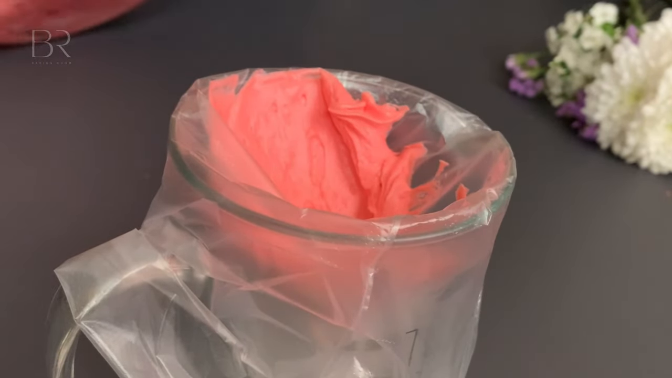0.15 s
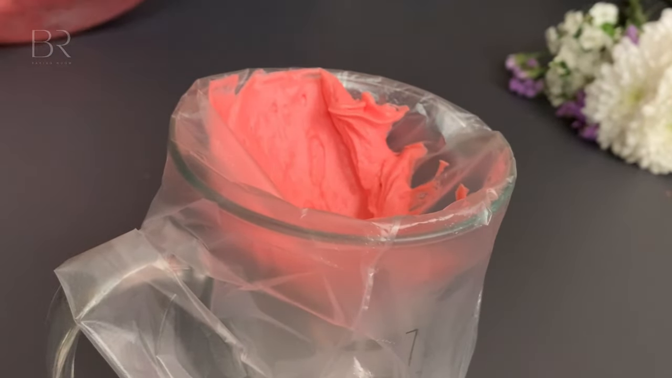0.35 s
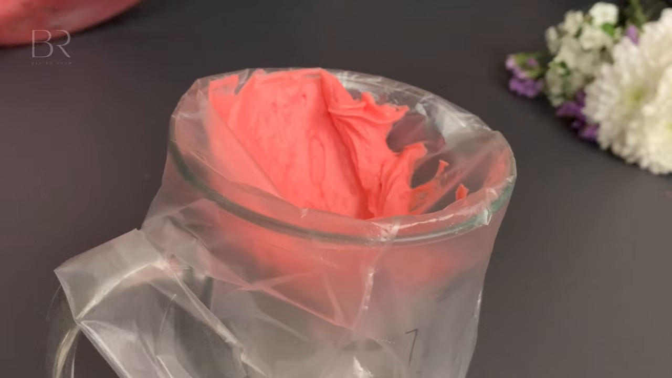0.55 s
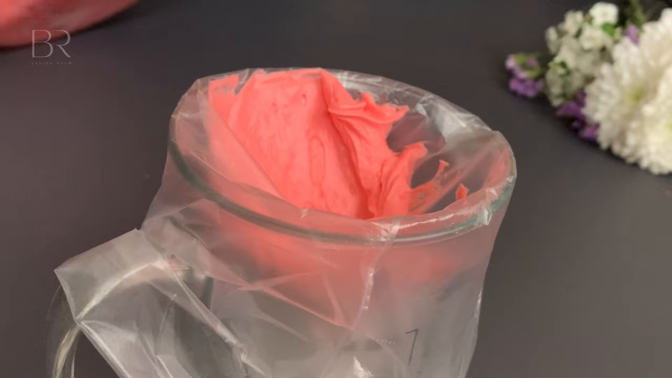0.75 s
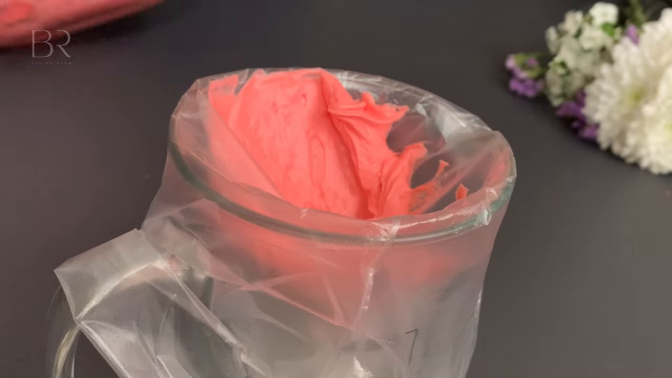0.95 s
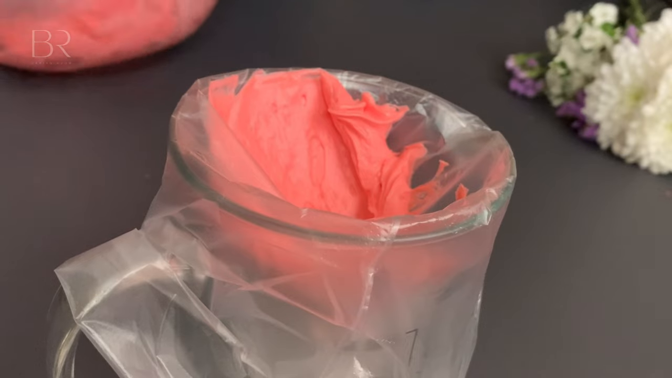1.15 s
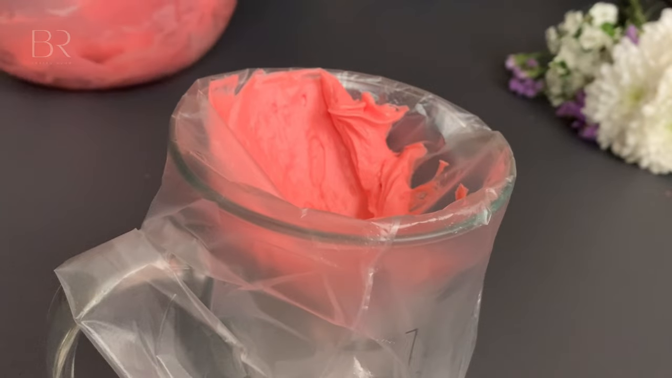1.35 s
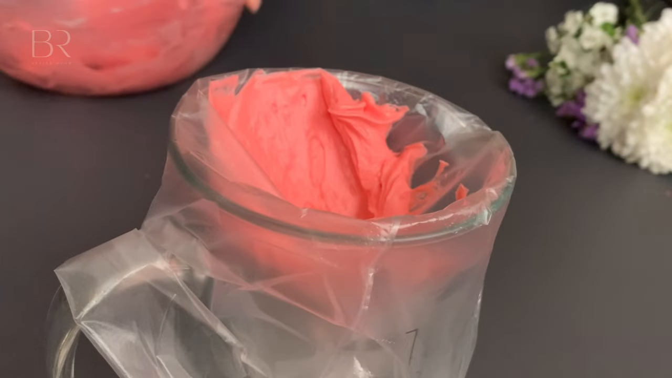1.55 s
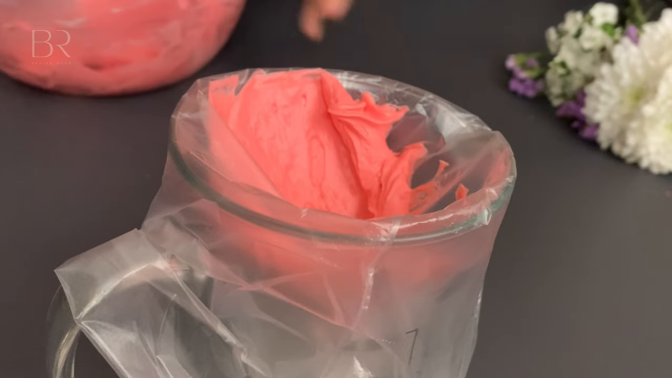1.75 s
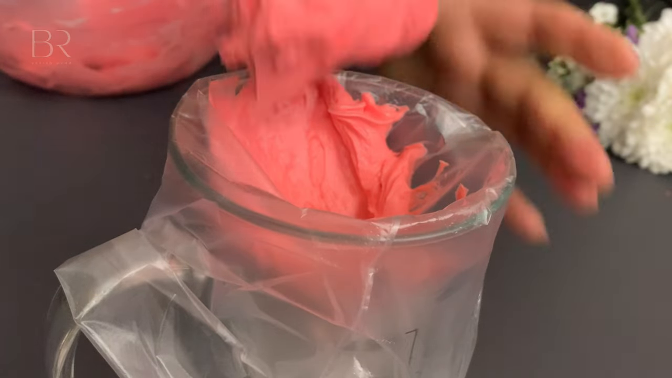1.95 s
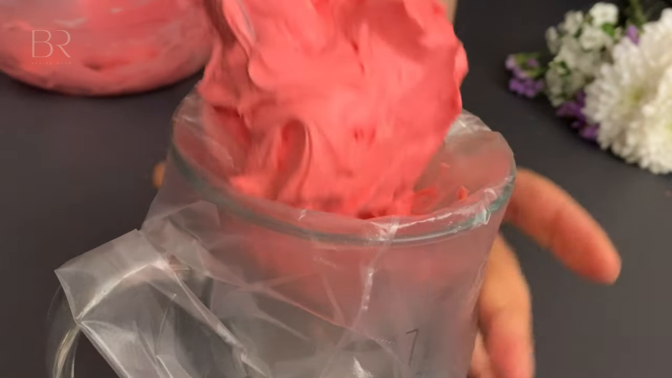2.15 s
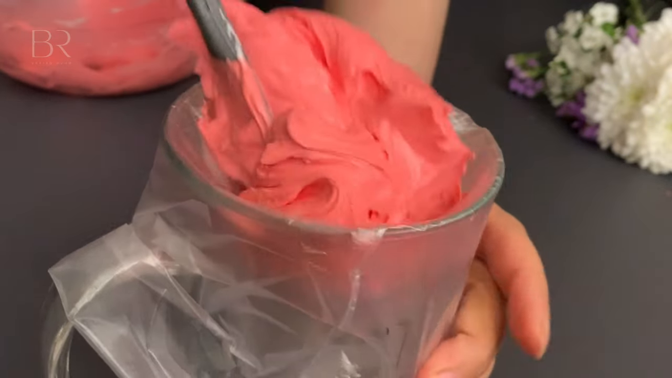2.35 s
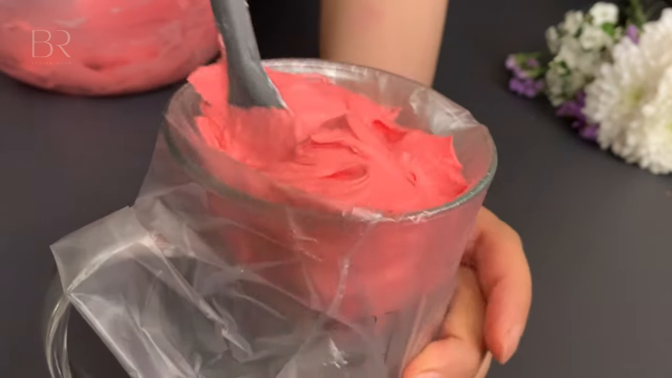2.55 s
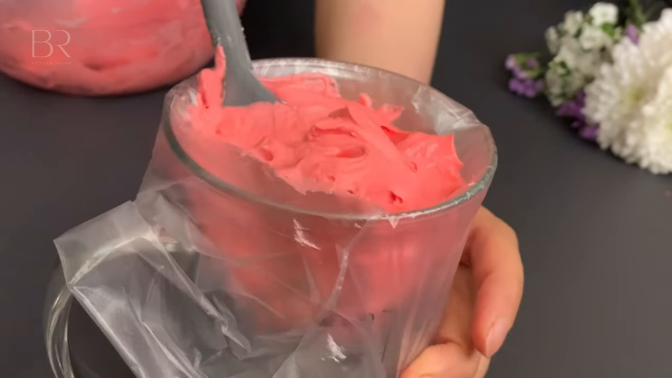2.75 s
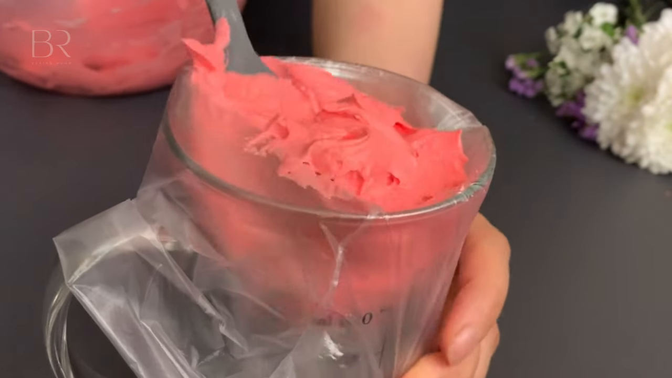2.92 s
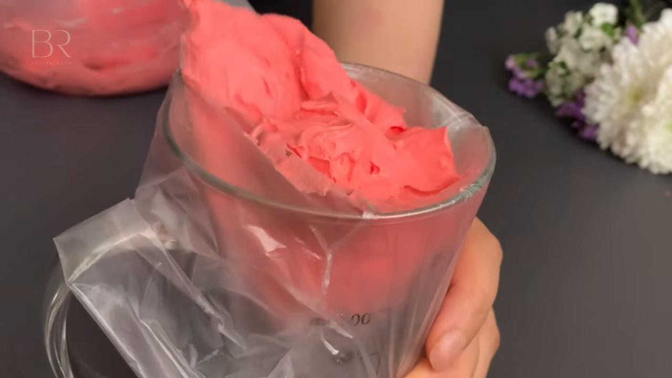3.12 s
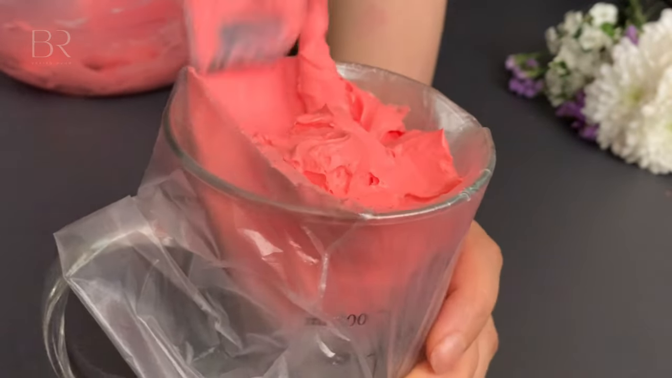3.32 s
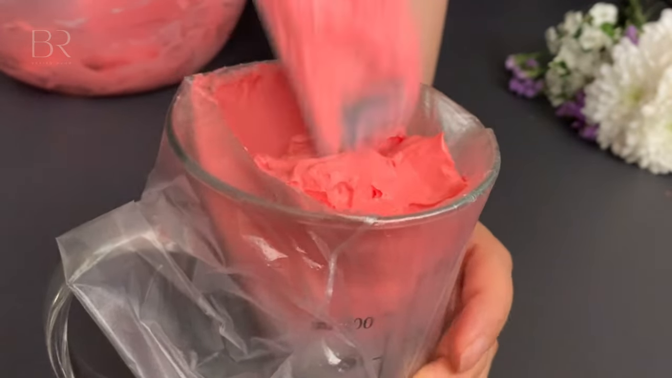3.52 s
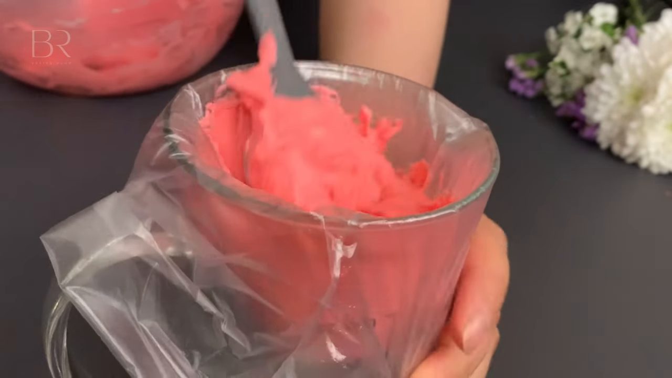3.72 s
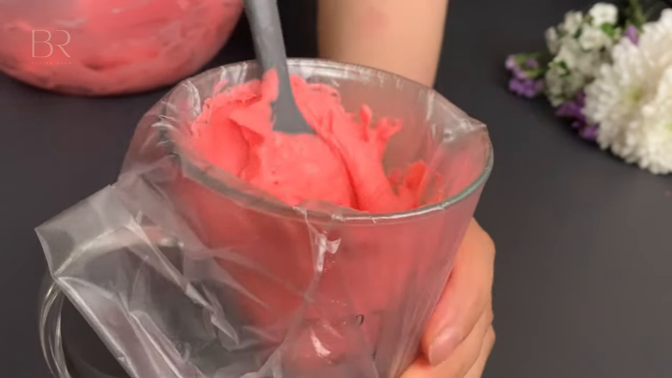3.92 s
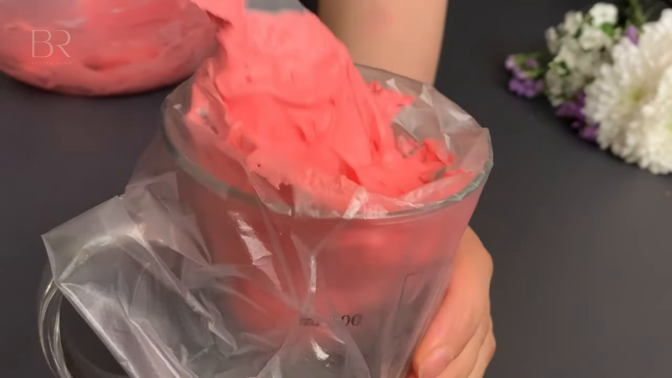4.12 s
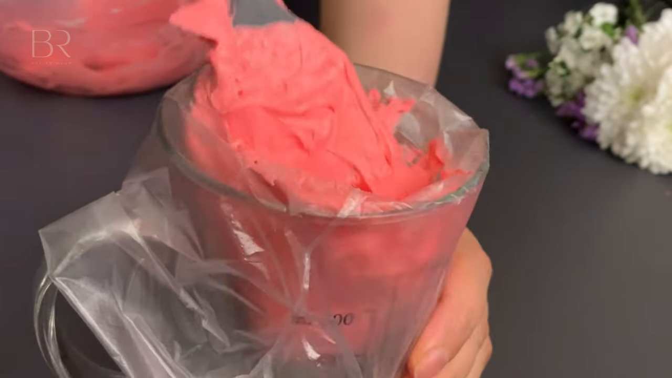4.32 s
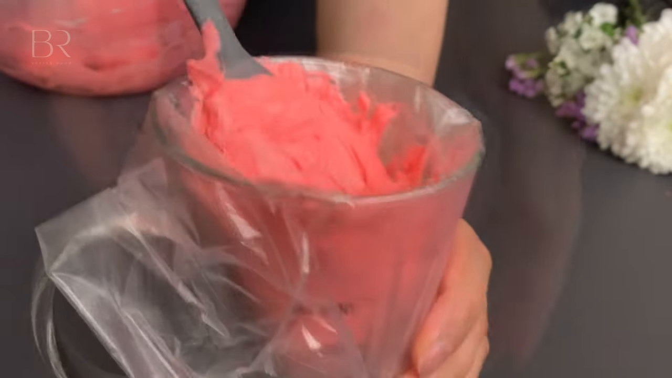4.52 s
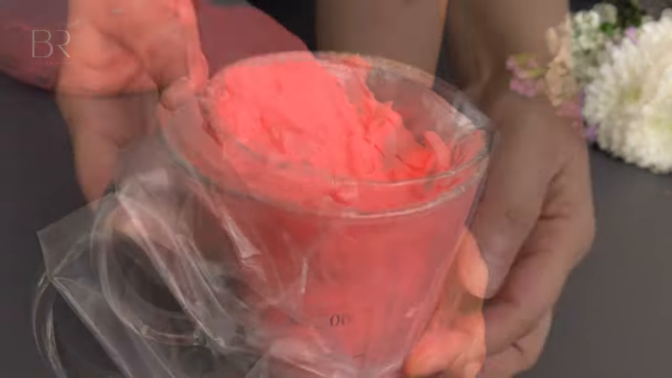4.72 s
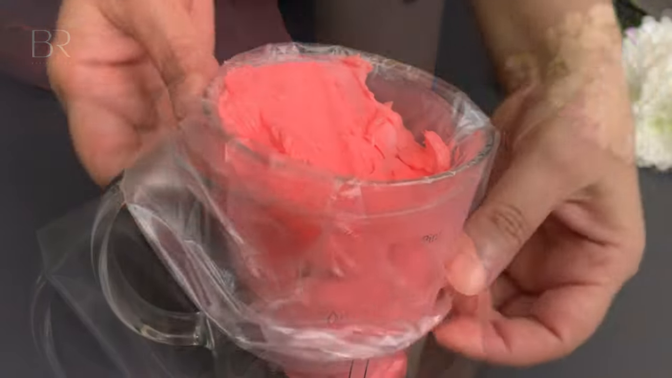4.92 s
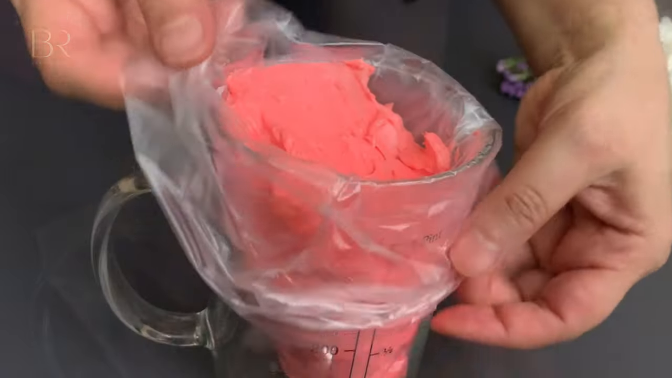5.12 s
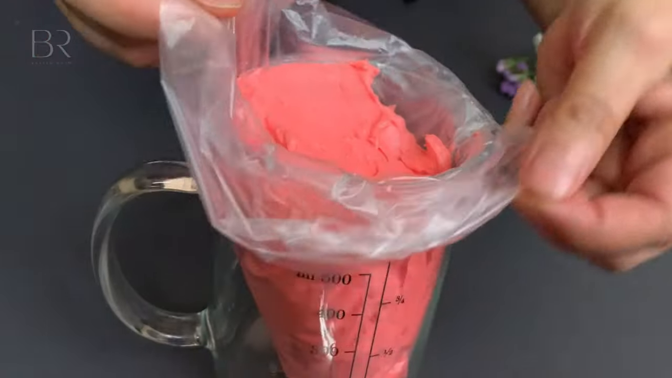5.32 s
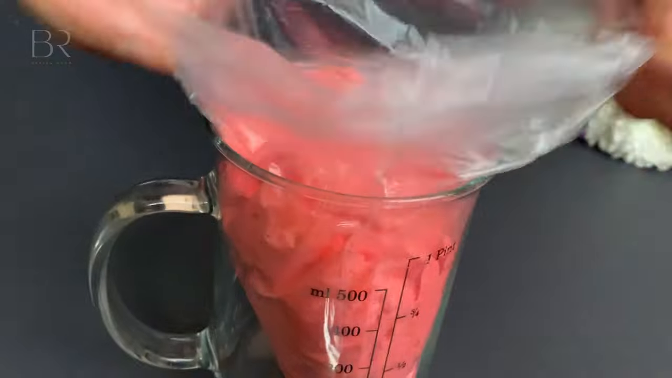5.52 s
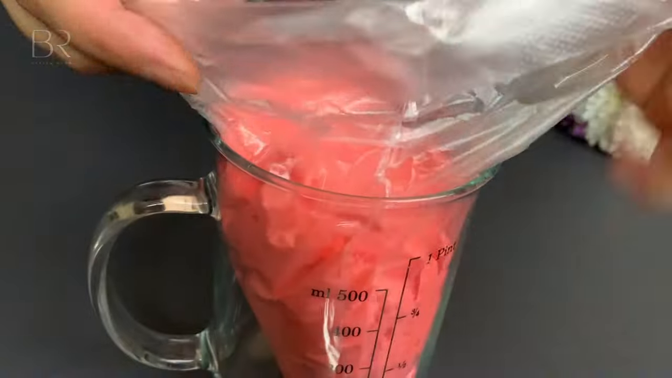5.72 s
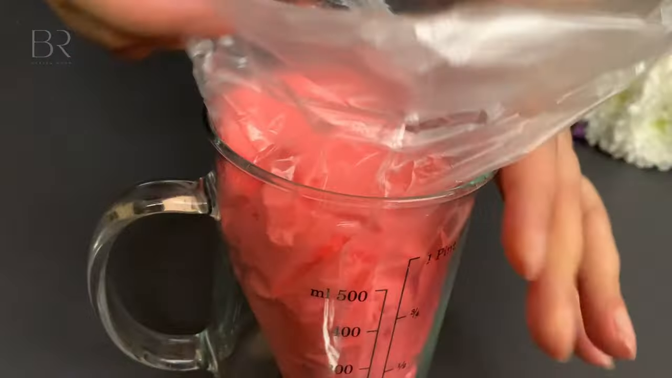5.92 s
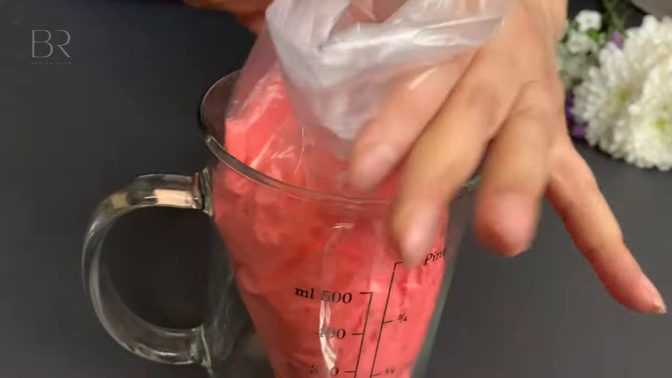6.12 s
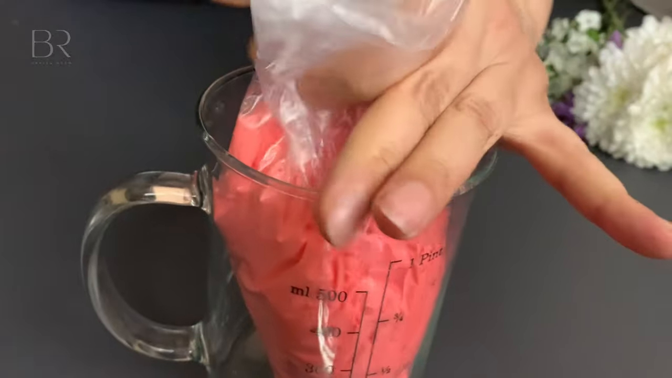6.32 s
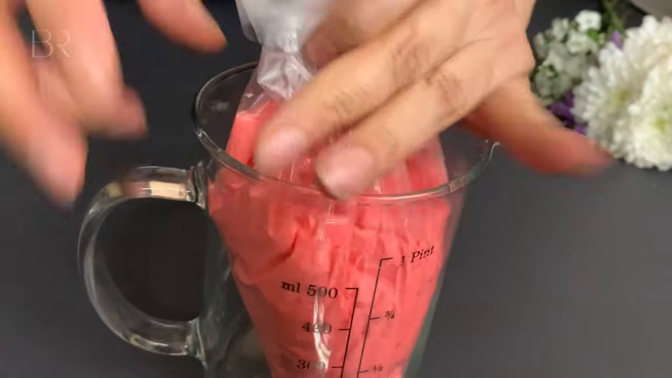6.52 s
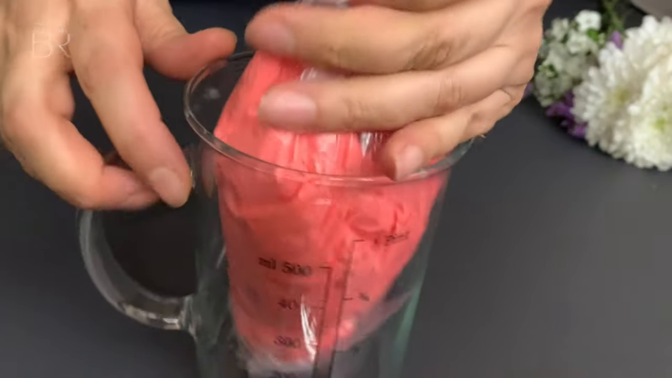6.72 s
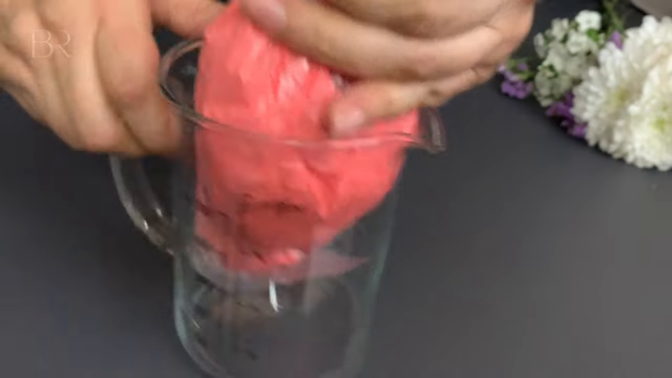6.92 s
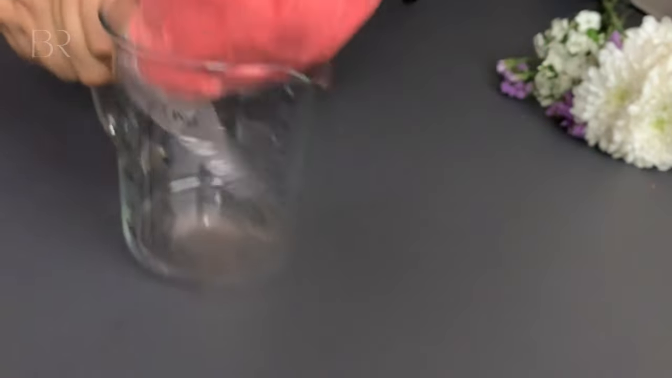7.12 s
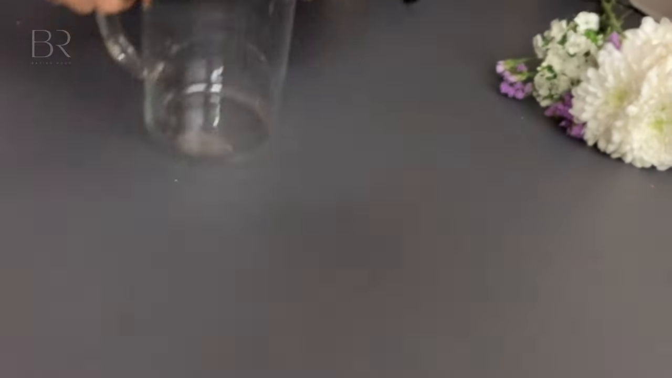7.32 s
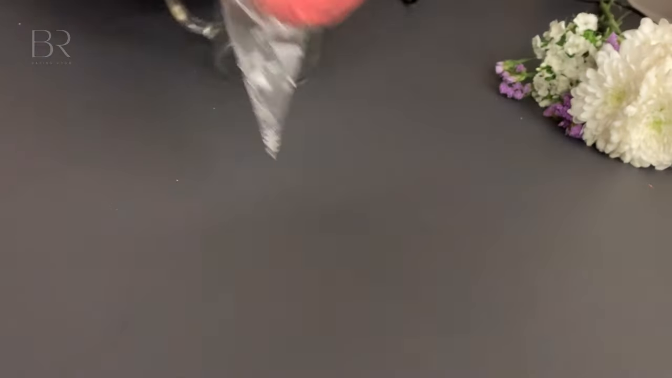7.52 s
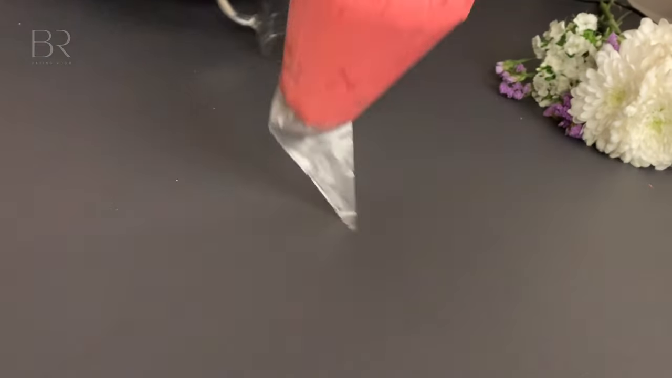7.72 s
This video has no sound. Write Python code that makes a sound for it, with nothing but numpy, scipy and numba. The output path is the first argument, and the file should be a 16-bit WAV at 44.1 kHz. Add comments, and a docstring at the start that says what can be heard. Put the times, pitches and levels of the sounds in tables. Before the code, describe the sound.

Thick frosting squelches and crackles as a spatula presses it into a thin plastic bag lining a glass jug, then the bag rustles out.

```python
"""Thick frosting, scraped off a spatula into a thin plastic piping bag that lines a glass jug, squelches and crackles.
Sticky film, bursting air pockets and creases are showers of short damped grains, with louder buckles one by one.
The mixing bowl rings faintly in damped modes and bumps the table; soft contacts give low notes and rubs of noise.
Then the bag is unfolded, gathered and pulled out; jug and trapped air resonate over the low rumble of a small kitchen."""
import sys
import numpy as np
from scipy import signal
from scipy.fft import rfft, irfft, next_fast_len
from scipy.io import wavfile
from numba import njit

SR = 44100
rng = np.random.default_rng(int(sys.argv[2]) if len(sys.argv) > 2 else 0)


def output_pcm(signal):
    """Save a mono or channel-first signal as 16-bit PCM at the path in sys.argv[1].

    Samples are clipped to [-1, 1] before scaling.
    """
    pcm = np.clip(np.atleast_2d(signal).T, -1, 1) * 32767
    wavfile.write(sys.argv[1], SR, np.round(pcm).astype(np.int16))


N = 342286
FFT_SIZE = next_fast_len(N, real=True)

# Spectrum of the kitchen air. Each row: frequency in Hz, level in dB.
KITCHEN_SPECTRUM = [(20, -7.5), (45, 3), (100, -2), (150, -15.5), (210, -16.5), (300, -21), (500, -35.5),
                    (1000, -43), (3000, -48), (7000, -53), (9500, -45.5), (11500, -61.5), (14500, -50),
                    (16000, -75)]
KITCHEN_DB = -58
# Nudges of the mixing bowl. Each row: start in seconds, level in dB, rise time in seconds, highest excited Hz.
BOWL_TOUCHES = [(.031, -64.5, 0.0053, 8000), (.042, -58.5, 0.0037, 4970), (0.061, -55, 0.0055, 4000),
                (.173, -69, 0.0042, 6000), (1.705, -50.5, 0.047, 1050), (1.689, -70, 0.01, 8030)]
# Modes of the glass bowl. Each row: frequency in Hz, level in dB, t60 in seconds.
BOWL_MODES = [(441, -7.5, 0.11), (1243, -1, 0.067), (1179, -1, 0.17), (2130, -8, 0.17), (3370, -14, 0.076),
              (3480, -5, 0.097), (4650, -10, 0.11), (4735, -22, 0.1), (6900, -9, 0.1)]
# Light brushes of bowl, bag and jug. Each row: start in seconds, level in dB, centre in Hz, t60 in seconds.
SCUFFS = [(0.04, -59.5, 447, 0.21), (.042, -73, 2000, 0.14), (.64, -72.5, 506, 0.55),
          (0.929, -65.5, 377, 0.15), (1.039, -78, 5900, .17), (1.255, -74, 4800, 0.055),
          (1.506, -70.5, 5000, .1), (1.512, -47.5, 215, 0.4), (1.519, -55.5, 550, 0.11),
          (1.53, -71, 650, 0.29), (1.511, -67, 1450, 0.076), (1.947, -69, 3900, 0.09),
          (2.719, -46, 217, 0.75), (7.1, -51.5, 210, 0.61), (7.25, -49.5, 178, 1),
          (7.709, -47.5, 416, 0.19)]
# Soft knocks of bowl, frosting and jug. Each row: start in seconds, level in dB, pitch in Hz, t60 in seconds.
KNOCKS = [(0.045, -60, 445, 0.2), (0.072, -36, 89, 0.053), (1.52, -42, 207.5, 0.22),
          (1.524, -32, 119, 0.08), (1.54, -22, 81, 0.072), (1.583, -34, 105, 0.079),
          (2.386, -25, 420, 0.029), (2.722, -24, 340, 0.012), (3.045, -30, 295, 0.025),
          (3.047, -42, 177, 0.058), (4.062, -14.5, 318, 0.011), (4.143, -18, 148, 0.016),
          (4.504, -38, 302, 0.03), (4.521, -25, 137, 0.017), (5.46, -27.5, 420, 0.058),
          (5.469, -41, 205, 0.28), (5.64, -41, 127, 0.124), (5.699, -31.5, 66.07, 0.13),
          (6.628, -38, 77, 0.38), (7.113, -40.5, 192, 0.072), (7.165, -45, 197, 0.12),
          (7.264, -32.5, 633, 0.026), (7.259, -37, 179, 0.12), (7.314, -41.5, 121.6, 0.17),
          (7.712, -46, 570, 0.13), (7.715, -42, 305, 0.12), (7.718, -41, 205, 0.23)]
# Creases snapping. Each row: start in seconds, level in dB, pitch in Hz.
SNAPS = [(0.3735, -63.5, 7200), (1.039, -58.5, 5790), (1.9465, -54, 4700), (2.141, -41, 6800),
         (2.1525, -50, 2830), (2.3265, -36.5, 6170), (2.4305, -36, 4883), (2.6599, -38.5, 6300),
         (2.8125, -34, 3620), (2.8818, -34.5, 6600), (2.938, -30.5, 5800), (2.9437, -34, 5870),
         (2.994, -48, 5200), (3.2058, -49, 5130), (3.212, -40.5, 7840), (3.4735, -45, 4340),
         (3.561, -38.5, 2490), (4.3226, -39, 3270), (4.336, -44, 4000), (4.7097, -43, 3960),
         (5.7354, -41, 4800), (5.8655, -33.5, 6800), (6.0725, -30, 3180), (6.2344, -38, 3080),
         (6.3145, -31, 2830), (6.413, -31.5, 6560), (6.886, -36.5, 2700), (7.1975, -33, 5030),
         (7.2084, -31, 4380), (7.47, -50, 2640), (7.575, -51, 3320), (7.6522, -40, 4000)]
# Soft folds and air pockets popping. Each row: start in seconds, level in dB, pitch in Hz.
POPS = [(2.084, -53, 1640), (2.1316, -43, 1570), (2.735, -29, 1890), (2.787, -35, 1880),
        (2.9484, -24.5, 1710), (2.986, -34, 1760), (3.078, -34, 1720), (3.0565, -26, 1760),
        (3.3834, -32.5, 1750), (3.6222, -44, 1830), (4.4384, -35, 1600), (4.003, -32, 1680),
        (4.0614, -23.5, 1800), (4.4937, -24.5, 1700), (5.4594, -23, 1260), (5.4666, -30, 1350),
        (5.574, -26, 1430), (5.8923, -24, 1390), (5.9184, -28, 1333), (6.0736, -21, 1250),
        (6.535, -32, 1770), (6.574, -36, 1090), (6.6109, -34, 1500), (6.6346, -31.5, 1540),
        (6.675, -29.5, 1500), (6.7, -35, 1850), (6.7188, -27, 1590), (6.7675, -32.5, 1390),
        (6.827, -34, 1620), (6.899, -35, 1140), (6.8852, -31.5, 1400), (7.0227, -32, 1600),
        (7.178, -32.5, 1130), (7.2077, -30, 2170), (7.343, -42.5, 1300)]
# A fold gives way in a few quick steps, each weaker than the last.
BUCKLE_GAP_S, BUCKLE_FALL_DB = .0026, 10.5

# Spatula strokes. Each row: start in seconds, attack in seconds, length in seconds, film crackle in dB,
# air pockets in dB above the film, squelch in dB above the film.
STROKES = [(2.119, 0.14, 0.17, -44.5, -1.5, -4), (2.308, 0.013, 0.16, -49.5, -3.5, 0.5),
           (2.473, 0.059, 0.1, -49.5, -4.5, -6.5), (2.597, 0.041, 0.076, -54.5, -1.5, -6),
           (2.681, 0.042, 0.17, -47, 1, 0.5), (2.854, 0.032, 0.16, -52, 0.5, 0),
           (3.025, 0.021, 0.06, -51.5, -2, 2.5), (3.115, 0.022, 0.091, -58, 1.5, -0.5),
           (3.261, 0.099, 0.13, -53, -2, -0.5), (3.538, 0.083, 0.14, -43.5, -2.5, -2.5),
           (3.688, 0.039, 0.14, -53, 6, -2), (3.854, 0.035, 0.11, -58, 0.5, -5.5),
           (3.958, 0.054, 0.12, -44, -1, -1), (4.02, 0.046, 0.096, -44, 3.5, 1.5),
           (4.174, 0.03, 0.084, -52.5, 2.5, -5.5), (4.311, 0.0041, 0.072, -57, 1, -1.5),
           (4.386, 0.058, 0.065, -43.5, 1, -2.5), (4.46, 0.043, 0.031, -48.5, -2.5, 9),
           (4.534, 0.083, 0.1, -51, 1.5, 0)]
# The spatula leans on the film between strokes. Each row: start in seconds, length in seconds.
LEANS = [(2.14, 1.23), (3.454, 1.395)]
# LEAN_WET_DB sets air pockets and squelch relative to the film.
LEAN_ATTACK_S, LEAN_DB, LEAN_WET_DB = 0.0074, -64.5, -0.5
# The frosting yields under a stroke; the film settles when let go.
STROKE_SAG_DB_PER_S, RELEASE_DB_PER_S = 21, 206
# Spectrum of the frosting's crackle. Each row: frequency in Hz, level in dB.
FROSTING_SPECTRUM = [(100, -9), (215, -3), (310, -9), (440, 0), (620, -8), (930, -10), (1250, -7),
                     (1780, -9.5), (2500, -12.5), (4000, -12.5), (6700, -14), (8200, -17.5), (10500, -18.5),
                     (13000, -103)]
# Resonance of the air pockets in the frosting. Each row: time in seconds, frequency in Hz.
POCKET_PITCH = [(2.15, 1750), (2.71, 1940), (3.53, 1680), (3.56, 1840), (3.8, 1790), (3.89, 1550),
                (4.19, 1980), (4.66, 1580), (4.7, 1700)]
# Hollow under the first dollop as it sinks in. Each row: time in seconds, resonance in Hz, level in dB.
FROSTING_HOLLOW = [(2.13, 509.5, -65), (2.16, 487, -53.5), (2.25, 465, -49), (2.45, 428, -69),
                   (2.55, 447, -52), (2.62, 426, -89)]

# Hand moves that unfold, lift, gather and pull out the bag. Each row: start in seconds, attack in seconds,
# length in seconds, film crackle in dB, folds in dB above the film, flapping in dB above the film.
HAND_MOVES = [(4.752, 0.33, 0.89, -49.5, -6, -10), (5.114, 0.058, 0.46, -52, -1.5, -7),
              (5.428, 0.027, 0.062, -41.5, 1.5, -6.5), (5.475, 0.081, 0.12, -41.5, 1, -1.5),
              (5.644, 0.02, 0.036, -47.5, -3.5, -7.5), (5.712, 0.023, 0.089, -54.5, 0.5, -1.5),
              (5.842, 0.064, 0.59, -46.5, 1, -6.5), (5.99, 0.08, 0.11, -43, 3.5, -3.5),
              (6.326, 0.028, 0.05, -51.5, 3, -2), (6.469, 0.059, 0.1, -49.5, 0, -4.5),
              (6.601, 0.018, 0.25, -53.5, -0.5, -5.5), (6.615, 0.025, 0.12, -73.5, 12, -4),
              (6.864, 0.015, 0.18, -52, -2, -14), (7.048, 0.019, 0.22, -53.5, -2.5, -12),
              (7.186, 0.015, 0.016, -50.5, -18, -14), (7.274, 0.033, 0.11, -56, -11, -5.5),
              (7.365, 0.02, 0.37, -58.5, -7, -27)]
HOLD_S, HOLD_DB = 4.74, -76.5  # from here on the held bag keeps rustling
# Spectrum of the bag's crackle. Each row: frequency in Hz, level in dB.
FILM_SPECTRUM = [(100, 1.5), (180, -8.5), (300, -8.5), (440, -9), (560, -9), (870, -10), (1300, -4.5),
                 (2500, -10), (4500, -9), (5800, -12), (6800, -9.5), (8200, -13.5), (10500, -14),
                 (13000, -104)]
# Resonance of the folds as the bag is stretched and gathered. Each row: time in seconds, frequency in Hz.
FOLD_PITCH = [(5.0, 1370), (5.43, 1560), (5.57, 1410), (6.08, 1300), (6.42, 1450), (6.55, 1720),
              (6.72, 1610), (6.9, 1550), (7.25, 1670)]
# Lone creases relative to the fizz: under the spatula, and on the loose bag.
STRAY_PRESSED_DB, STRAY_LOOSE_DB = -11.5, -15
# Taut patches of film. Each row: centre in Hz, share as a gain.
PATCHES = [(2900, 1), (4000, 0.18), (5300, 0.77), (7000, 0.52)]
# Glass jug, rung by the film that touches it. Each row: frequency in Hz, width in Hz, gain.
JUG_MODES = [(3730, 24, 0.096), (5100, 21, 0.26), (5155, 16, 0.093), (6590, 120, 0.6), (8200, 67, 0.99)]
# The crackle bounces between the walls of the jug and the table.
BOUNCE_DB, BOUNCE_T60_S = -10, .035

# The jug dragged on the table. Each row: start in seconds, attack in seconds, length in seconds, rumble in dB.
JUG_SHIFTS = [(5.427, 0.066, 0.38, -50), (5.867, 0.051, 0.46, -60), (6.657, 0.19, 1.27, -52)]
# Air in the jug as the bag slides out in jerks. Each row: time in seconds, resonance in Hz, level in dB.
JUG_AIR = [(7.06, 391.4, -59), (7.11, 419.6, -59), (7.15, 463.6, -51.5), (7.175, 498, -77), (7.2, 541, -58),
           (7.235, 554.5, -53), (7.25, 568, -63), (7.268, 578, -57), (7.287, 572, -69), (7.322, 603, -48),
           (7.345, 600, -68), (7.38, 602, -64), (7.43, 620, -70)]
SLIP_DB = -4  # rubbing relative to the air tone
# The microphone pair. Each row: frequency in Hz, side minus mid in dB, side phase in rad, diffuse share (0-1).
MICROPHONE_PAIR = [(40.5, -14.5, 1, 1), (119, -3.5, 1.3, 0.5), (205, -8, 1, 0.9), (314, 4.5, 1.0, 0.8),
                   (423, 2.5, 1.92, 0.07), (704, 0, 1.5, 0.1), (1420, -6.5, 1.77, 0.64),
                   (2180, -2.5, 2.06, 1), (2940, 1.5, 1.5, 0.9), (5100, 0.5, 1.5, 0.85), (7100, -1, 2, 1),
                   (8800, -0.5, 4.5, 0.3), (9700, 0.5, -6, 1), (14500, 0.5, 4, 1)]
TOP_HZ = 15400


def undb(db):
    """The decibel as a logarithm of amplitude: decibels to gain."""
    return 10 ** (np.asarray(db) / 20)


def unit(x):
    """Normalisation of power: scale to rms 1."""
    return x / np.sqrt(np.mean(x ** 2))


def decay(t, t60):
    """Exponential damping: the amplitude falls by 60 dB in t60 seconds."""
    return np.exp(-np.log(1000) * t / t60)


def fader(s, db):
    """Interpolation of level: gain along a curve in dB, silent outside it."""
    return undb(np.interp(np.arange(N) / SR, s, db, left=-150, right=-150))


def over_hz(table):
    """Interpolation over log frequency: the columns of a table, read at every bin."""
    hz, *columns = np.transpose(table)
    bins = np.log(np.maximum(np.fft.rfftfreq(FFT_SIZE, 1 / SR), 1))
    return [np.interp(bins, np.log(hz), column) for column in columns]


def colour(x, table):
    """Linear filtering: shape a sound by a table of frequency and level."""
    return irfft(rfft(x, FFT_SIZE) * undb(over_hz(table)[0]))[:N]


def band(x, lo_hz, hi_hz, order=2):
    """Band-pass filtering by a Butterworth response."""
    return signal.sosfilt(signal.butter(order, [lo_hz, hi_hz], "band", fs=SR, output="sos"), x)


def noise_band(length, lo_hz, hi_hz, order=2):
    """Filtered randomness: band-limited Gaussian noise of rms 1."""
    return unit(band(rng.standard_normal(length), lo_hz, hi_hz, order))


def add(out, s, x):
    """Superposition: mix a short sound in at time s."""
    i = int(s * SR)
    out[i:i + len(x)] += x[:max(N - i, 0)]


def reflections(t60):
    """Diffuse reverberation: a dense, fading train of random echoes with energy 1."""
    t = np.arange(SR // 2) / SR
    echoes = rng.standard_normal(len(t)) * decay(t, t60) * (t > .001)
    return echoes / np.linalg.norm(echoes)


def kitchen():
    """Modulated noise: low rumble with a faint hiss swells and sinks; its upper part wanders on its own."""
    swell = noise_band(N, 1.0, 11.0, order=1)
    wander = noise_band(N, 1.5, 7)
    air = unit(colour(rng.standard_normal(N), KITCHEN_SPECTRUM))
    low = band(air, 20, 770, order=1)
    upper = band(air, 140, 520, order=1)
    air = air + upper * (undb(2.2 * wander) - 1)
    return (air + low * (undb(2.0 * swell) - 1)) * undb(KITCHEN_DB)


def bowl():
    """Modal vibration: the bowl chatters on the table and rings; soft contacts spare the high modes."""
    out, t = np.zeros(N), np.arange(SR // 3) / SR
    for s, db, rise_s, top_hz in BOWL_TOUCHES:
        for hz, mode_db, t60 in BOWL_MODES:
            # the rubbing foot keeps shaking each mode a little
            chatter = noise_band(len(t), hz - 110, hz + 110)
            ring = np.sin(2 * np.pi * hz * t) + 0.45 * chatter
            fade = (1 - np.exp(-t / rise_s)) * decay(t, t60)
            softness = 1 / (1 + (hz / top_hz) ** 4)
            add(out, s, undb(db + mode_db) * softness * fade * ring)
    return out


def scuffs():
    """Friction noise: short, soft rubs that swell and decay in a band."""
    out, t = np.zeros(N), np.arange(SR // 2) / SR
    for s, db, hz, t60 in SCUFFS:
        rub = noise_band(len(t), hz / 1.6, hz * 1.6)
        rise = 1 - np.exp(-t / (0.083 * t60))
        add(out, s, undb(db) * rub * rise * decay(t, t60))
    return out


def knocks():
    """Damped oscillation: soft contacts build over about half a cycle and give one note each."""
    out, t = np.zeros(N), np.arange(SR // 3) / SR
    for s, db, hz, t60 in KNOCKS:
        rise = 1 - np.exp(-(2 * hz * t) ** 2)
        add(out, s, undb(db) * rise * decay(t, t60) * np.sin(2 * np.pi * hz * t))
    return out


def clicks(table, cycles, tick, tail_db, tail_t60):
    """Buckling instability: a quick run of ticks, each ringing near the fold's pitch, as the film settles."""
    out, t = np.zeros(N), np.arange(4096) / SR
    for s, db, hz in table:
        crack = noise_band(len(t), 1800, 7500, order=3)
        settle = noise_band(len(t), hz / 2, hz * 1.08) * decay(t, tail_t60)
        add(out, s, undb(db + tail_db) * settle)
        for step, (late, detune) in enumerate(rng.uniform(-1, 1, (3, 2))):
            own_hz = hz * (1 + 0.034 * step * detune)
            rise = 1 - np.exp(-t * hz * 2)
            ring = np.sin(2 * np.pi * own_hz * t) * decay(t, cycles / own_hz) * rise
            # each step takes another stretch of the same noise
            snap = np.roll(crack, step * len(t) // 3) * np.exp(-t / .0007)
            step_s = s + step * BUCKLE_GAP_S * (1 + late / 3)
            add(out, step_s, undb(db - step * BUCKLE_FALL_DB) * (ring + tick * snap))
    return out


@njit
def grains(s, hz, t60, size):
    """Damped resonance: each grain is a small patch that jumps and rings out within a few cycles."""
    out = np.zeros(N)
    for k in range(len(s)):
        start, z = int(s[k] * SR), size[k] + 0j
        p = np.exp((2j * np.pi * hz[k] - np.log(1000) / t60[k]) / SR)
        for i in range(start, min(N, start + int(t60[k] * SR))):
            z *= p
            out[i] += z.imag
    return out


def crackle(lo_hz, hi_hz, rate, cycles, spread_db, tone):
    """Superposition of random events: a shower of grains, each with its own pitch and length; rms 1."""
    when, place, strength, sign, length = rng.random((int(rate * N / SR), 5)).T
    hz = lo_hz * (hi_hz / lo_hz) ** place
    excess = np.minimum(-np.log(1 - strength), 4.5)
    # most grains are dead, a few taut patches ring several times longer
    ring = .5 - np.log(1 - length)
    # small patches are brief, so they need a higher peak for the same energy per Hz
    size = np.sign(sign - .5) * hz * undb(spread_db * excess)
    return unit(colour(grains(when * N / SR, hz, cycles * ring / hz, size), tone))


def avalanches(rate, fade_s, steady):
    """Avalanche dynamics: one fold sets off its neighbours, a sudden surge that dies down; rms 1."""
    when, strength = rng.random((int(rate * N / SR), 2)).T
    kicks = np.bincount((when * N).astype(int), .25 + strength ** 2, N)
    surges = signal.lfilter([1], [1, -np.exp(-1 / (fade_s * SR))], kicks ** 2)
    return unit(np.sqrt(steady + surges))


def resonate(x, pitch, width_hz):
    """Moving resonance: its centre follows a curve of time and Hz and wanders a little around it."""
    wander = 1 + 0.022 * noise_band(N, 2.7, 25, order=1)
    hz = np.interp(np.arange(N) / SR, *np.transpose(pitch)) * wander
    turn = np.exp(2j * np.pi * np.cumsum(hz) / SR)
    pole = np.exp(-np.pi * width_hz / SR)
    # shift the centre to 0 Hz, low-pass, and shift it back
    return 2 * (signal.lfilter([1 - pole], [1, -pole], x / turn) * turn).real


def push(start, attack, length, sag_db_per_s=0):
    """Loading and relaxation: pressure on the film builds, holds or sags, then is let go; gain over time."""
    age = np.maximum(np.arange(N) / SR - start, 0)
    build = np.minimum(age / max(attack, 1 / SR), 1)
    return build * undb(-sag_db_per_s * age - RELEASE_DB_PER_S * np.maximum(age - length, 0))


def together(pushes, levels_db):
    """Incoherent addition: overlapping pushes add in power."""
    return np.sqrt(sum((gain * undb(db)) ** 2 for gain, db in zip(pushes, levels_db)))


def taut(film, gain, full_db, slope, stray_db):
    """Tension brightens: harder work on the film brings out the finest creases; lone ones tick out of the fizz."""
    sheen_tone = [(9000, -20), (12500, 0), (15000, -4)]  # Hz, dB
    sheen = undb(-17.5) * crackle(11500, 15500, rate=2600, cycles=14, spread_db=1.5, tone=sheen_tone)
    strays = crackle(1500, 8500, rate=70, cycles=6, spread_db=1, tone=FILM_SPECTRUM)
    top = band(film, 7800, 12300, order=1)
    tension = (gain / undb(full_db)) ** slope
    return (film - top + tension * (top + sheen) + undb(stray_db) * strays) * gain


def spatula_work():
    """Forcing by the spatula: gains of film, air pockets and squelch from the strokes and the leaning."""
    pushes = [push(*row[:3], sag_db_per_s=STROKE_SAG_DB_PER_S) for row in STROKES]
    pushes += [push(s, LEAN_ATTACK_S, length) for s, length in LEANS]
    levels = [row[3:] for row in STROKES] + [(LEAN_DB, LEAN_WET_DB, LEAN_WET_DB)] * len(LEANS)
    db, pocket_db, squelch_db = np.transpose(levels)
    return [together(pushes, db + above) for above in (0, pocket_db, squelch_db)]


def frosting(film_gain, pop_gain, squelch_gain):
    """Adhesion and release: frosting dragged over film gives fine crackle, bursting air pockets, a low squelch."""
    film = crackle(2363, 10850, rate=4800, cycles=19, spread_db=0.8, tone=FROSTING_SPECTRUM)
    pops = crackle(777, 2500, rate=1700, cycles=7.5, spread_db=1.4, tone=FROSTING_SPECTRUM)
    squelch = crackle(78.0, 834, rate=900, cycles=4.8, spread_db=1.5, tone=FROSTING_SPECTRUM)
    # the frosting lets go in sticky gulps
    squelch = unit(squelch + .6 * band(squelch, 185, 270, order=1))
    squelch = squelch * avalanches(rate=70, fade_s=.012, steady=.3)
    # air pockets burst in small clusters, and those of like size favour one pitch
    pops = pops * avalanches(rate=70, fade_s=.005, steady=.22)
    pops = unit(pops + 2.66 * resonate(pops, POCKET_PITCH, width_hz=240))
    film = taut(film, film_gain, full_db=-35.5, slope=0.74, stray_db=STRAY_PRESSED_DB)
    return film + pops * pop_gain + squelch * squelch_gain


def hollow(table, waver):
    """Cavity resonance: air driven through a narrow gap rings the cavity; its pitch follows the opening."""
    s, hz, db = np.transpose(table)
    phase = 2 * np.pi * np.cumsum(np.interp(np.arange(N) / SR, s, hz)) / SR
    flutter = noise_band(N, 9.0, 44)
    # level and phase flutter one second apart, so they seem unrelated
    tone = (1 + waver * flutter) * np.sin(phase + waver * np.roll(flutter, SR))
    return unit(tone) * fader(s, db)


def hand_work():
    """Forcing by the hands: gains of film, folds and flapping from the moves and the rustle of the held bag."""
    pushes = [push(*row[:3]) for row in HAND_MOVES]
    db, fold_db, flap_db = np.transpose(HAND_MOVES)[3:]
    held = undb(HOLD_DB) * push(HOLD_S, LEAN_ATTACK_S, N / SR)
    parts = ((0, 1), (fold_db, .8), (flap_db, .65))  # dB above the film, share of the held rustle
    return [np.hypot(together(pushes, db + above), share * held) for above, share in parts]


def bag(film_gain, fold_gain, flap_gain):
    """Buckling of a thin sheet: tiny creases fizz, larger folds buckle, and the loose sheet flaps."""
    film = crackle(2180, 11170, rate=6500, cycles=15.3, spread_db=-1.7, tone=FILM_SPECTRUM)
    folds = crackle(705, 2420, rate=2400, cycles=5.5, spread_db=2.0, tone=FILM_SPECTRUM)
    flaps = crackle(106, 702, rate=830, cycles=7.3, spread_db=0.0, tone=FILM_SPECTRUM)
    fold_body = 0.53 * band(folds, 920, 2300, order=1)
    folds = unit(folds + fold_body + 5.8 * resonate(folds, FOLD_PITCH, width_hz=1380))
    # folds give way in quick, overlapping crumples
    folds = folds * avalanches(rate=130, fade_s=.009, steady=.3)
    flaps = unit(flaps + 0.84 * band(flaps, 175, 270, order=1))
    film = taut(film, film_gain, full_db=-32.0, slope=0.58, stray_db=STRAY_LOOSE_DB)
    return film + folds * fold_gain + flaps * flap_gain


def bounce(x):
    """Early reflection: close, hard surfaces thicken each tick and give the crackle a fine, fixed colour."""
    echoes = signal.fftconvolve(x, reflections(BOUNCE_T60_S)[:SR // 20])[:N]
    return (x + undb(BOUNCE_DB) * echoes) / np.hypot(1, undb(BOUNCE_DB))


def crinkle(spatula, hands):
    """Source and resonator: crackle from one side of the jug flares up patch by patch, tinted by the glass."""
    x = frosting(*spatula) + bag(*hands)
    flared = x
    for hz, share in PATCHES:
        drift = .3 * noise_band(N, 1.5, 8, order=1)
        flare = avalanches(rate=45, fade_s=0.016, steady=0.2) - 1 + drift
        flared = flared + share * band(x, hz / 0.92, hz * 1.14, order=1) * flare
    treble = band(flared, 2200, 16000, order=1)
    x = flared - treble + bounce(treble)
    glass = sum(gain * band(x, hz - width / 2, hz + width / 2, order=1) for hz, width, gain in JUG_MODES)
    return x + glass


def jug():
    """Sliding friction: the jug rumbles as it shifts on the table."""
    drag = together([push(*row[:3]) for row in JUG_SHIFTS], [row[3] for row in JUG_SHIFTS])
    return noise_band(N, 44.0, 65, order=1) * drag


def slipping():
    """Stick-slip: the full bag slips on the glass and rings the air in the jug, rising in pitch as it opens."""
    s, hz, db = np.transpose(JUG_AIR)
    slips = crackle(280, 1100, rate=260, cycles=4, spread_db=1.5, tone=FILM_SPECTRUM)
    rub = unit(resonate(slips, np.column_stack([s, hz]), width_hz=94)) * fader(s, db + SLIP_DB)
    return hollow(JUG_AIR, waver=0.3) + rub


def scene():
    """Direct and diffuse fields: all sources in a small room; the side mixes direct sound, other folds and echoes."""
    surge = avalanches(rate=130, fade_s=0.016, steady=1.1)
    hits = bowl() + scuffs() + knocks() + hollow(FROSTING_HOLLOW, waver=0.87) + slipping()
    hits = hits + clicks(SNAPS, cycles=30, tick=.5, tail_db=-20, tail_t60=.05)
    hits = hits + clicks(POPS, cycles=13, tick=.1, tail_db=-27, tail_t60=.04)
    spatula, hands = spatula_work(), hand_work()
    near = surge * crinkle(spatula, hands) + hits
    room = undb(-12) * signal.fftconvolve(near, reflections(t60=.22))[:N]
    mid = near + room + jug() + kitchen()
    hit_echoes = signal.fftconvolve(hits, reflections(t60=0.08))[:N]
    scattered = surge * crinkle(spatula, hands) + hit_echoes + jug() + kitchen()
    side_db, phase, diffuse = over_hz(MICROPHONE_PAIR)
    direct = np.sqrt(1 - diffuse ** 2) * np.exp(1j * phase) * rfft(mid, FFT_SIZE)
    side = irfft(undb(side_db) * (direct + diffuse * rfft(scattered, FFT_SIZE)))[:N]
    return np.array([mid + side, mid - side])


def record(dry):
    """Band limitation: the phone close by cuts the top with a steep elliptic low-pass."""
    return signal.sosfilt(signal.ellip(8, .2, 70, TOP_HZ, fs=SR, output="sos"), dry)


dry = scene()
out = record(dry)
output_pcm(out)
```